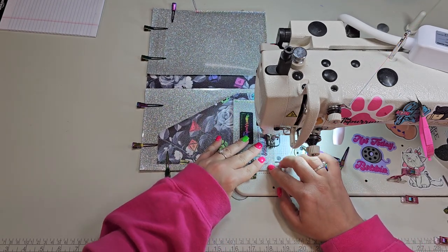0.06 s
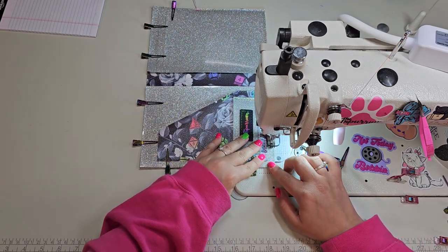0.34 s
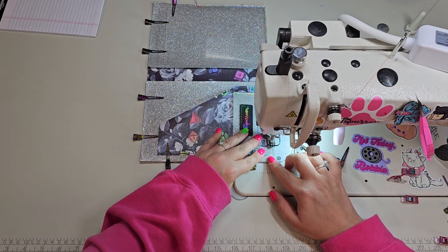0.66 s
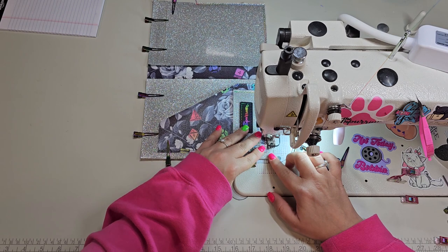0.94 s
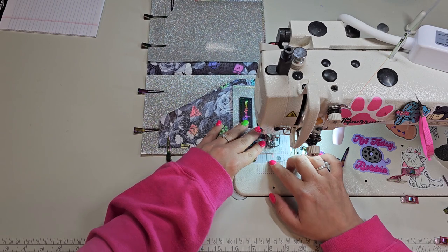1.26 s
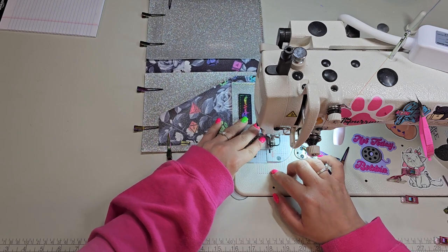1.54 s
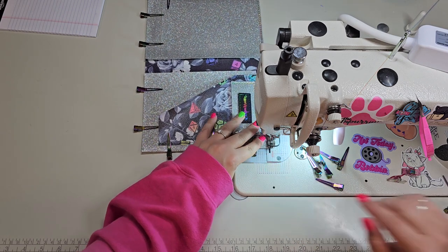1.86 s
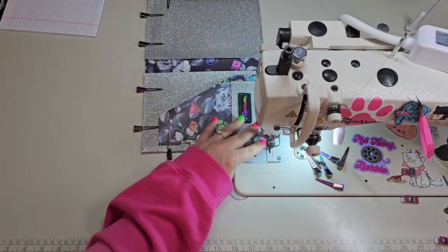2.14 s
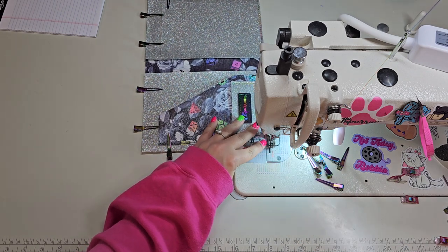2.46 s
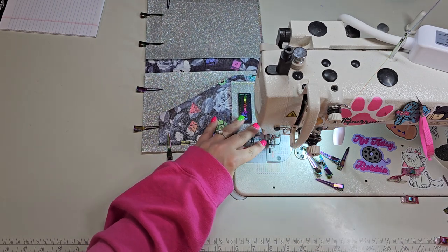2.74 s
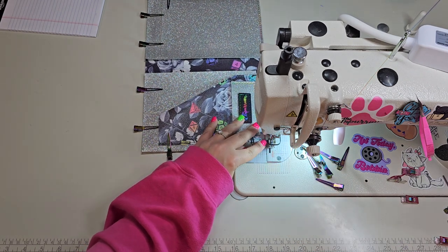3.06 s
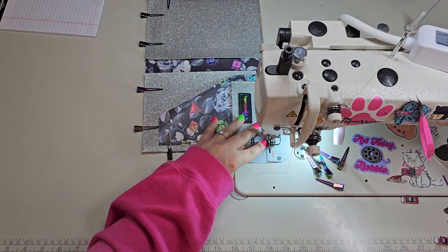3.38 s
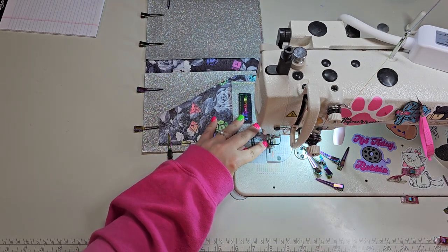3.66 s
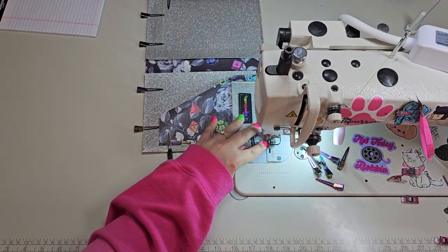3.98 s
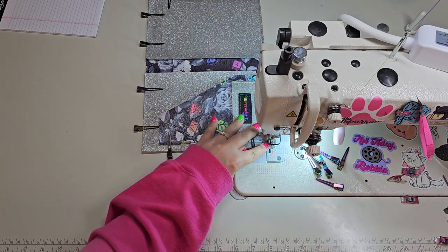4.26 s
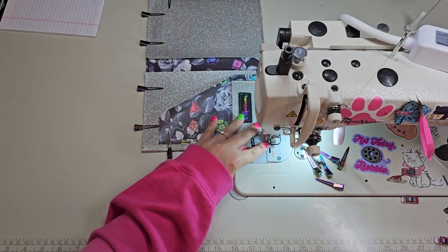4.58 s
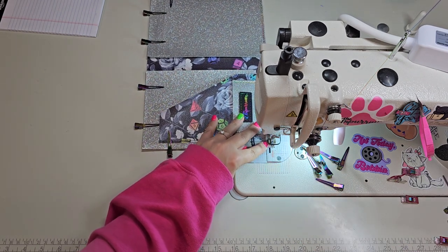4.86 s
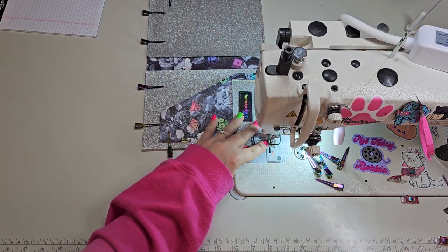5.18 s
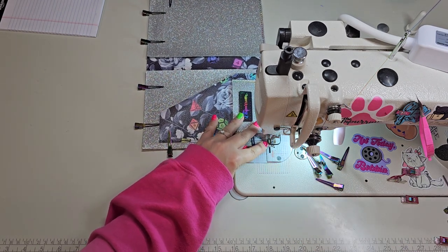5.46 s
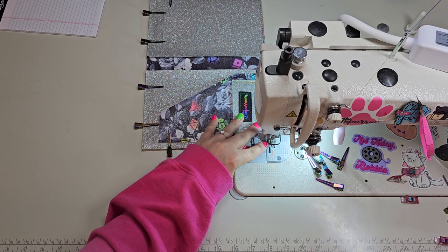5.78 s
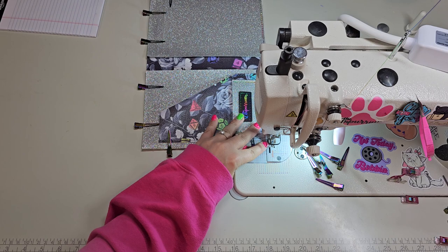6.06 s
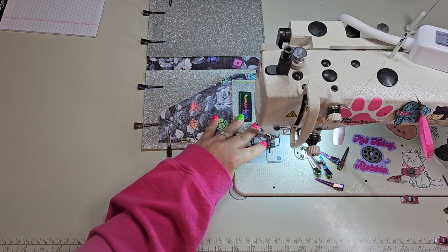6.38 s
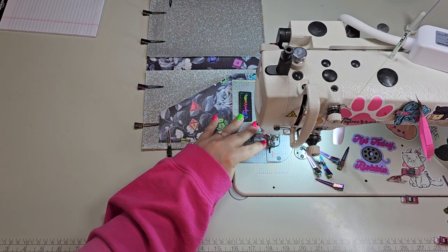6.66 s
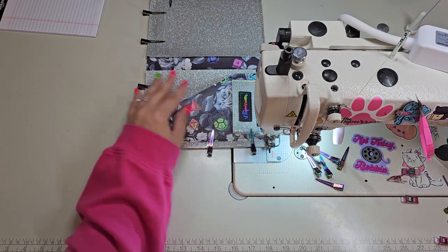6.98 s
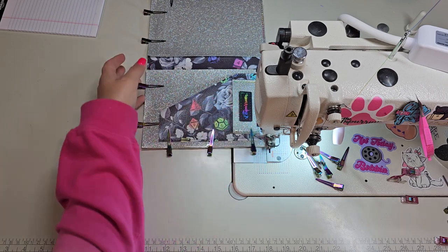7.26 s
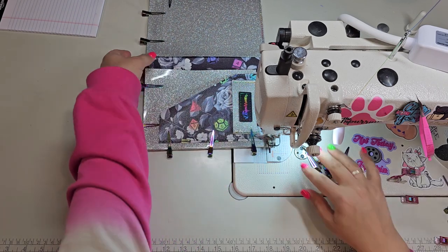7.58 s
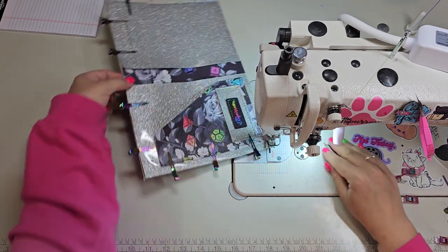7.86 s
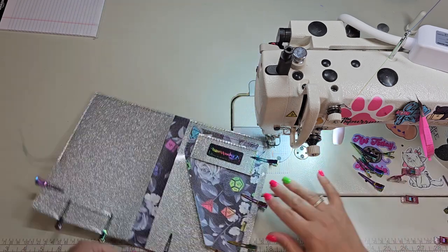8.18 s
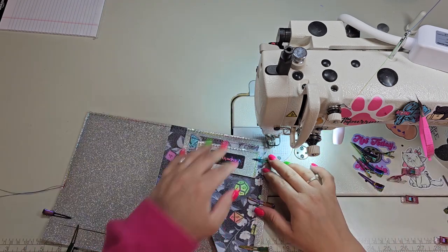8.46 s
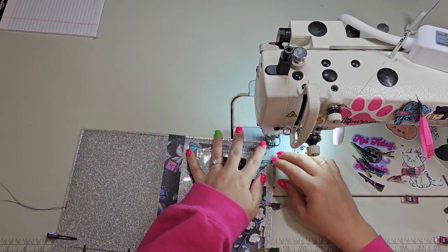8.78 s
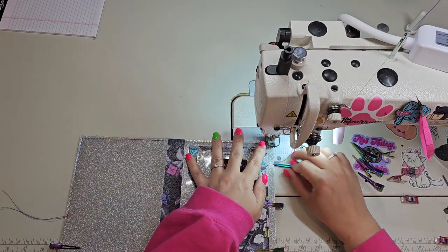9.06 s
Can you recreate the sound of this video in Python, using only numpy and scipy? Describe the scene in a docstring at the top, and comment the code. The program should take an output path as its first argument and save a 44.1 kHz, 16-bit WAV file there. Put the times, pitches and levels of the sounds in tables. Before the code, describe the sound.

Heard close by in a small, quietly humming room, a heavy sewing machine clatters through a brief, uneven run of stitches and slows to a halt. A lever clacks and creaks, and a few knocks follow before a lull. In the last third the handling gets busier: sharp clicks, light metallic pings, dull bumps of hands on the table and the soft hiss of vinyl being pushed around.

```python
"""Slow, clashing stitches: a walking-foot industrial sewing machine working through layered vinyl.
Each stitch is a needle clash, a foot drop and a thump of the feed over the rumble of the drive.
Then the machine rests: levers clack, small steel parts ping, hands bump the table and slide the work.
Heard from beside the table in a small ventilated room, on a stereo pair of microphones
whose faint hiss sinks in the pauses."""
import sys
import numpy as np
from scipy import signal
from scipy.fft import rfft, irfft, next_fast_len
from scipy.io import wavfile

SR = 44100
rng = np.random.default_rng(int(sys.argv[2]) if len(sys.argv) > 2 else 0)


def master_out(mix):
    """Clip the mix to full scale and print it as 16-bit PCM to the path in sys.argv[1]."""
    frames = np.transpose(np.atleast_2d(mix))
    ceiling = np.clip(frames, -1, 1)
    pcm = np.round(ceiling * 32767).astype(np.int16)
    wavfile.write(sys.argv[1], SR, pcm)


N = 407043
TIME = np.arange(N) / SR
BLOW = np.arange(-SR // 10, SR * 2 // 5) / SR   # seconds round one contact
FULL_SPEED_TURN_S, LOAD_SHARE = 0.16, 0.56   # fastest turn of the shaft; share of a turn under load
RATTLE_BY_SPEED = 2.6   # dB gained per dB of shaft speed

# Turns of the main shaft. Each row: needle punch in seconds, length of the turn in seconds,
# foot gain in dB, feed thump gain in dB.
STITCHES = [(-0.1, 0.17, -28.5, -37.5), (0.0539, 0.2, -32.5, -57), (0.4639, 0.21, -28.5, -46.5),
            (0.6496, 0.16, -29.5, -45), (0.818, .17, -30, -43), (0.9874, .169, -29.5, -45),
            (1.156, .183, -32, -48), (1.3413, 0.18, -35, -48.5), (1.5326, 0.19, -29, -51),
            (1.723, 0.26, -37, -68)]
# How alike the two microphones hear the room. Each row: frequency in Hz, left-right correlation.
LIKENESS = [(100, 0.98), (300, 0.82), (600, .5), (1200, 0.041), (2500, 0.22), (5000, 0.031), (12000, .05)]
# Spectrum of a hard clack on the machine. Each row: frequency in Hz, relative level in dB.
CLACK_COLOUR = [(400, -13), (650, 4), (900, -2.5), (1350, 2.5), (1750, -4), (2300, 2.5), (3200, -3),
                (4400, -6.5), (6500, -17.5)]
# Spectrum of rubbed vinyl. Each row: frequency in Hz, relative level in dB.
RUB_COLOUR = [(600, 8), (1000, 3.5), (1300, 6), (2600, 6), (5200, 0.5), (8000, -15), (11000, -11),
              (15000, -37)]


def from_db(db):
    """Decibels to gain."""
    return 10 ** (np.asarray(db) / 20)


def rms_one(x):
    """Scale to unit power."""
    return x / np.sqrt(np.mean(x ** 2) + 1e-20)


def at_hz(points, hz):
    """Read a table on a log-frequency axis."""
    f, value = np.transpose(points)
    return np.interp(np.log(hz + 1), np.log(f), value)


def panned(x, left_db):
    """Lean a sound towards the left microphone."""
    return x * from_db([[left_db / 2], [-left_db / 2]])


def noise(colour, size=len(BLOW), ripple_db=0):
    """Coloured stereo noise of unit power, diffuse in the treble; ripple adds small resonances."""
    padded = next_fast_len(size)
    hz = np.arange(padded // 2 + 1) * SR / padded
    mid, side = np.exp(2j * np.pi * rng.random((2, len(hz))))
    ripple = np.interp(hz, np.geomspace(700, 17000, num=260), 2.3 * rng.random(260) ** 2 - 1, left=0)
    alike = np.clip(at_hz(LIKENESS, hz), 0, 1)
    roll_off = np.minimum(hz / colour[0][0], 1) ** 4 / np.maximum(hz / colour[-1][0], 1) ** 2
    pair = np.sqrt(1 + alike) * mid + np.sqrt(1 - alike) * side * [[1], [-1]]
    spectrum = pair * roll_off * from_db(at_hz(colour, hz) + ripple_db * ripple)
    return rms_one(irfft(spectrum, padded)[:, :size])


def envelope(rise, hold, t60):
    """A contact swells up to time zero, holds and dies away; all times in seconds."""
    swell = np.exp(np.minimum(BLOW, 0) / max(rise, 1 / SR))
    return swell * from_db(-60 * np.maximum(BLOW - hold, 0) / t60)


def burst(carrier, shape):
    """Noise under an envelope, scaled to the envelope's energy."""
    return rms_one(carrier * shape) * np.sqrt(np.mean(shape ** 2))


def grain(depth_db, per_s, size=len(BLOW)):
    """Quick random changes of level, unit power."""
    steps = np.arange(size) * per_s / SR
    wander = np.interp(steps, np.arange(size // 8), rng.standard_normal(size // 8))
    return rms_one(from_db(depth_db * wander))


def ring(modes, vary_db):
    """Struck modes, a little different at each blow; high ones reach the microphones out of step."""
    age, out = np.maximum(BLOW, 0), 0
    for (hz, db, t60), (force, skew) in zip(modes, rng.standard_normal((len(modes), 2))):
        alike = np.clip(at_hz(LIKENESS, hz), 0, 1)
        lag = np.arccos(alike) / 2 * np.sign(skew) * np.array([[1], [-1]])
        out = out + from_db(db + vary_db * force - 60 * age / t60) * np.sin(2 * np.pi * hz * age + lag)
    return out * (BLOW > 0)


def add(track, s, sound):
    """Mix one contact into a track at s seconds."""
    start = round((s + BLOW[0]) * SR)
    first, last = max(start, 0), min(start + len(BLOW), N)
    track[:, first:last] += sound[:, first - start:last - start]


def repeated(colour, body, same):
    """The same parts collide each stitch, so a share of their dense ringing repeats."""
    return np.sqrt(same) * body + np.sqrt(1 - same) * noise(colour, ripple_db=5)


def speed_db(turn):
    """Shaft speed against full speed, in dB."""
    return 20 * np.log10(FULL_SPEED_TURN_S / turn)


def room():
    """Room tone: ventilation with a low, wavering hum, a little to the left."""
    # Moving air. Each row: frequency in Hz, relative level in dB.
    air_colour = [(15, -28), (25, 3.5), (33, -11.5), (92, -5), (195, -15.5), (285, -10), (384, -19.5),
                  (591, -14.5), (1020, -26.5), (1440, -19), (1700, -28), (5140, -40), (8140, -64),
                  (9570, -55), (16000, -54)]
    # Hum tones. Each row: frequency in Hz, level in dB.
    tones = [(91.5, -87), (285.3, -83.5)]
    hum = 0
    for hz, db in tones:
        tone = from_db(db) * np.sqrt(2) * np.sin(2 * np.pi * hz * TIME)
        hum = hum + tone * grain(depth_db=3, per_s=13, size=N)
    air = from_db(-67.5) * noise(air_colour, size=N)
    return panned(air + hum, left_db=2.0)


def lifter_creaks():
    """The foot lifter sticks and slips, creaking in its resonances."""
    # Creaks. Each row: start in seconds, length in seconds, level in dB.
    creaks = [(2.562, 0.054, -49), (7.472, 0.057, -62), (7.491, 0.1, -56)]
    # The lifter's resonances. Each row: centre in Hz, width in Hz, relative level in dB.
    resonances = [(1181, 21, 17), (2430, 570, 2.5), (2970, 440, -14)]
    out, hz = np.zeros((2, N)), np.geomspace(600, 6000, num=200)
    response = sum(from_db(db) / np.hypot(1, 2 * (hz - centre) / width)
                   for centre, width, db in resonances)
    colour = np.column_stack([hz, 20 * np.log10(response)])
    for s, length, db in creaks:
        slips = noise(colour, ripple_db=5.5) * grain(depth_db=3, per_s=400)
        slips *= grain(depth_db=1.5, per_s=70.7)
        add(out, s, from_db(db) * slips * envelope(rise=0.0021, hold=length, t60=0.054))
    return out


def finger_rubs():
    """Fingers rub the work with a grainy rasp."""
    # Rubs. Each row: start in seconds, length in seconds, level in dB.
    rubs = [(2.653, 0.053, -55.5), (2.77, 0.072, -58.5), (2.875, 0.0067, -62.5), (6.462, 0.17, -57.5),
            (7.756, 0.11, -58), (9.131, 0.12, -48)]
    out = np.zeros((2, N))
    for s, length, db in rubs:
        rub = noise(RUB_COLOUR, ripple_db=5) * grain(depth_db=3, per_s=300)
        add(out, s, from_db(db) * rub * envelope(rise=0.0088, hold=length, t60=0.15))
    return out


def vinyl_slides():
    """Vinyl hisses across the bed; each push starts briskly, eases off and stops."""
    # Pushes. Each row: start in seconds, length in seconds, level in dB.
    pushes = [(2.594, .015, -50), (6.533, 0.053, -53.5), (6.72, .23, -73.5), (7.971, 0.51, -54),
              (8.881, .06, -56), (9.16, .1, -57)]
    # Sliding vinyl. Each row: frequency in Hz, relative level in dB.
    colour = [(290, -49.5), (500, -23), (553, -7.5), (716, -11), (815, -0.5), (1130, -11), (1240, -5),
              (1670, -9), (1990, -4.5), (2500, -18), (3150, -7.5), (7130, -6.5), (15500, -1.5)]
    rise_s, ease_db_per_s, t60_s = 0.01, 7, 0.18
    level = np.zeros(N)
    for s, length, db in pushes:
        age = TIME - s
        fall_db = ease_db_per_s * np.maximum(age, 0) + 60 * np.clip(age - length, 0, 1) / t60_s
        level += np.exp(np.clip(age / rise_s, -20, 0)) * from_db(db - fall_db)
    level *= grain(depth_db=3.5, per_s=35, size=N)
    return level * noise(colour, size=N, ripple_db=5) * grain(depth_db=1, per_s=630, size=N)


def steel_pings():
    """A small steel tool is touched: it clicks and rings briefly."""
    # Touches. Each row: time in seconds, gain in dB.
    touches = [(6.198, -47.5), (6.665, -47), (6.952, -42), (6.975, -41), (6.998, -53.5), (7.3795, -58),
               (7.392, -53)]
    # The click. Each row: frequency in Hz, relative level in dB.
    colour = [(900, -5), (1700, 13.5), (2300, 3), (3200, -4.5), (5000, -12), (6500, -5.5), (16000, -10)]
    # The tool's modes. Each row: frequency in Hz, relative level in dB, t60 in seconds.
    modes = [(2060, -12, 0.056), (5050, -17, 0.073), (5040, -3.5, 0.074), (9168, -11.5, 0.08),
             (14000, -31, .07)]
    out = np.zeros((2, N))
    for s, db in touches:
        click = noise(colour, ripple_db=8) * grain(depth_db=3, per_s=400)
        clink = from_db(-10) * burst(click, envelope(rise=0.0015, hold=0.003, t60=0.1))
        add(out, s, from_db(db) * (clink + ring(modes, vary_db=1)))
    return out


def table_bumps():
    """Hands and pedal stir only the table's low notes, which linger faintly in the room."""
    # Bumps. Each row: time in seconds, gain in dB, swell in seconds, pitch in Hz.
    bumps = [(2.689, -42, 0.055, 178), (3.802, -41, 0.0052, 175), (4.414, -52.5, .008, 88),
             (4.518, -43, 0.017, 89.5), (6.366, -52, .0065, 103), (6.427, -44.5, 0.02, 110),
             (6.461, -39.5, 0.0069, 151), (6.493, -39, 0.013, 178), (6.782, -52, .06, 195),
             (7.68, -51, 0.0088, 234), (7.795, -36.5, 0.022, 170), (7.821, -37.5, .0044, 232),
             (8.812, -41.5, 0.0046, 128), (9.005, -37.5, 0.02, 123), (9.038, -40.5, 0.011, 88.5),
             (9.119, -37.5, 0.0013, 173)]
    # A soft bump. Each row: multiple of the pitch, relative level in dB.
    colour = [(.55, -16), (.72, -1), (1, 2), (1.4, -4), (2.3, -12.5), (4, -19.5), (12, -35), (30, -43)]
    out = np.zeros((2, N))
    for s, db, swell, hz in bumps:
        contact = envelope(rise=swell, hold=0.0036, t60=0.17)
        linger = from_db(-19.5) * envelope(rise=swell, hold=0.015, t60=0.68)
        low_notes = noise(np.array(colour) * [hz, 1])
        add(out, s, from_db(db - 6) * burst(low_notes, contact + linger))
    return panned(out, left_db=-0.8)


def lever_clacks():
    """Levers, clips and fingernails strike: a crack, a bright tick, ringing iron, a table thud."""
    # Strikes. Each row: time in seconds, clack, thud and tick gains in dB, hardness from 0 to 1.
    strikes = [(0.292, -53, -68, -57.5, 0.36), (0.374, -51.5, -67, -90, 0),
               (0.5075, -34.5, -42.5, -36, 0.26), (1.7827, -49, -54, -62, 0.94),
               (1.8708, -53.5, -59, -57, 0), (2.6262, -39.5, -49, -38, 0.8),
               (3.2701, -62.5, -76, -66, 0.05), (3.4013, -55, -61, -90, 0), (3.6989, -47, -58.5, -60, 0),
               (3.7877, -38, -33, -41.5, 0.54), (4.321, -62, -63, -60, 0.5), (4.351, -50.5, -71, -65, .08),
               (4.4992, -42.5, -41.5, -58, 0.23), (6.199, -45.5, -51.5, -49, 0.24),
               (6.4226, -57, -74, -53.5, 0.02), (6.4833, -41, -44.5, -59, 0),
               (6.5623, -40, -54, -35.5, 0.56), (6.612, -41.5, -58, -54, .05), (6.663, -37.5, -52, -48, .2),
               (7.326, -82, -65, -50.5, 0.2), (7.5913, -44.5, -51.5, -48.5, 0.29),
               (7.797, -45.5, -39, -45.5, 0), (8.2812, -64, -63, -49, 0.6), (8.354, -46, -46.5, -71, 0.62),
               (8.3975, -42.5, -56, -37, 0), (8.4286, -39, -45.5, -34, 0.4), (8.4343, -37, -43, -33, 0.92),
               (8.8033, -43.5, -64, -46, 0), (8.9986, -39, -38.5, -49.5, 0.01)]
    # The tick and the thud. Each row: frequency in Hz, relative level in dB.
    tick_colour = [(3000, -8.5), (5000, -2.5), (7000, -4), (9000, -6.5), (12000, -10), (16000, -8.5)]
    thud_colour = [(60, -21), (95, 3), (160, -1), (300, 4.5), (400, 4.5), (560, -6), (700, -21.5),
                   (1000, -30.5)]
    # Modes of iron casting and table. Each row: frequency in Hz, relative level in dB, t60 in seconds.
    casting_modes = [(1066, -13, .1), (1307, -4, 0.11), (1850, -12, 0.1), (2080, -5, .15), (2230, -7, .09),
                     (2420, -8, 0.12), (2945, -13, 0.1), (3420, -14, .08), (4290, -17, 0.13),
                     (4657, -10, .09)]
    table_modes = [(95, -7, 0.27), (215, -16.5, 0.17), (287.5, -11.5, 0.6), (307.7, 3, 0.15),
                   (411, -1, 0.09), (493.3, -2.5, 0.2), (546, -16, .12)]
    out = np.zeros((2, N))
    for s, clack_db, thud_db, tick_db, hardness in strikes:
        clack = from_db(clack_db) * noise(CLACK_COLOUR, ripple_db=8)
        tick = from_db(tick_db) * noise(tick_colour, ripple_db=7)
        crack = burst(clack + tick, envelope(rise=0.0002, hold=0.001, t60=0.022))
        crack *= hardness * from_db(clack_db + 7.5)
        tail = clack * envelope(rise=0.0013, hold=0.0036, t60=0.16)
        tail += tick * envelope(rise=0.0004, hold=0.0012, t60=0.145)
        chatter = from_db(-7.5) * tail * grain(depth_db=3.5, per_s=890)
        casting = from_db(clack_db - 6) * ring(casting_modes, vary_db=2)
        table = from_db(-8.5) * ring(table_modes, vary_db=1)
        thud = from_db(-5.5) * burst(noise(thud_colour), envelope(rise=0.00084, hold=0.0098, t60=0.2))
        add(out, s, crack + chatter + casting + from_db(thud_db) * (thud + table))
    return panned(out, left_db=0.2)


def drive():
    """Belt, shafts and bearings rumble under the load of each stitch, then coast; faster is louder."""
    # The rumble. Each row: frequency in Hz, relative level in dB.
    colour = [(50, -23), (110, -4.5), (160, -7), (235, 5), (390, -12.5), (550, -0.5), (700, -23),
              (1300, -12), (2000, -19), (2700, -26), (3150, -8), (3800, -34), (7000, -26.5), (15000, -35.5)]
    out = np.zeros((2, N))
    load = envelope(rise=0.017, hold=LOAD_SHARE * FULL_SPEED_TURN_S, t60=0.57)
    for s, turn, _, _ in STITCHES:
        rumble = noise(colour) * grain(depth_db=2, per_s=140)
        add(out, s, from_db(-48.5 + 1.2 * speed_db(turn)) * burst(rumble, load))
    return panned(out, left_db=1.3)


def linkage_clatter(per_turn):
    """Play in the linkage adds small ticks at chance moments in the loaded part of every turn."""
    full_speed_db, spread_db = -47.5, 6
    out = np.zeros((2, N))
    for s, turn, _, _ in STITCHES:
        for share, force in zip(rng.random(per_turn), rng.standard_normal(per_turn)):
            db = full_speed_db + spread_db * force + RATTLE_BY_SPEED * speed_db(turn)
            tick = burst(noise(CLACK_COLOUR, ripple_db=8), envelope(rise=0.0005, hold=0.001, t60=0.05))
            add(out, s + share * LOAD_SHARE * turn, from_db(db) * tick)
    return out


def feed():
    """The feed reverses at half a turn: it thumps, rattles, and ticks as its slack is taken up."""
    # Modes of the thump. Each row: frequency in Hz, relative level in dB, t60 in seconds.
    modes = [(60.3, -41.5, 0.097), (87.7, -0.5, 0.18), (156.2, -1.5, 0.59), (251, -2.5, 0.18),
             (300, -8.5, 0.1)]
    # The rattle. Each row: frequency in Hz, relative level in dB.
    colour = [(60, 3), (240, 19), (380, -3.5), (530, -13), (900, 4.5), (2500, 10), (4500, 8.5),
              (8500, -0.5), (16000, -0.5)]
    out = np.zeros((2, N))
    for punch, turn, _, thump_db in STITCHES:
        s = punch + 0.5 * turn
        rattle_db = -41.5 + RATTLE_BY_SPEED * speed_db(turn)
        thump = from_db(thump_db) * ring(modes, vary_db=1)
        rattle = burst(noise(colour, ripple_db=8), envelope(rise=0.00082, hold=0.0032, t60=0.19))
        slack = burst(noise(CLACK_COLOUR, ripple_db=8), envelope(rise=0.0013, hold=0.0023, t60=0.03))
        add(out, s, thump + from_db(rattle_db) * rattle)
        add(out, s + 0.053, from_db(rattle_db - 6) * slack)
    return panned(out, left_db=-0.9)


def foot():
    """The foot lands with one sharp steel tick and a dull tap on the needle plate."""
    # The tick. Each row: frequency in Hz, relative level in dB.
    colour = [(50, 15.5), (130, -27.5), (240, 6), (380, 1.5), (520, 18.5), (800, 6), (1300, 10),
              (2500, -3.5), (4300, 7), (7000, 10), (8300, -3), (9500, 9), (11200, -0.5), (13000, 12),
              (16000, -1.5)]
    # Modes rung by the landing. Each row: frequency in Hz, relative level in dB, t60 in seconds.
    modes = [(218.4, -30, .2), (552, -26, 0.42), (1300, -24.5, .12), (2030, -23, 0.2), (4188, -21, .2),
             (6971, -16, .19), (12850, -26, .15), (12952, -24, 0.196), (13361, -27, .15)]
    landing_share = 0.35   # of a turn, after the punch
    out, body = np.zeros((2, N)), noise(colour, ripple_db=7)
    for punch, turn, db, _ in STITCHES:
        steel = repeated(colour, body, same=0.97) * grain(depth_db=3.5, per_s=320)
        tick = from_db(-9) * burst(steel, envelope(rise=0.00025, hold=0.0071, t60=0.12))
        tap = from_db(-11) * burst(noise(CLACK_COLOUR), envelope(rise=0.00016, hold=0.00052, t60=0.021))
        add(out, punch + landing_share * turn, from_db(db) * (tick + tap + ring(modes, vary_db=1.6)))
    return out


def needle():
    """The point squeezes through the vinyl; then the needle bar clashes, ringing arm and table."""
    # The clash. Each row: frequency in Hz, relative level in dB.
    colour = [(40, 1), (90, -41), (230, 19), (370, 3), (520, 12), (750, 1.5), (1100, 4.5), (1700, 5.5),
              (3100, 8), (5500, 7), (8500, 2.5), (10500, 3), (13000, 7), (16000, 2.5)]
    # Modes of arm and table. Each row: frequency in Hz, relative level in dB, t60 in seconds.
    modes = [(156.8, -16, 0.24), (230, -20.5, 0.11), (521, -25, 0.15), (1058, -17, 0.08),
             (2050, -23.5, 0.23), (2582, -10.5, 0.13), (2940, -22, 0.17), (3090, -19.5, 0.33),
             (4640, -24.5, 0.18), (5400, -26.5, .15)]
    out, body = np.zeros((2, N)), noise(colour, ripple_db=4.5)
    for s, turn, _, _ in STITCHES:
        db = -25.5 + 0.34 * speed_db(turn)
        pierce = from_db(-21) * noise(RUB_COLOUR) * envelope(rise=0.021, hold=0, t60=0.03)
        chatter = repeated(colour, body, same=0.61) * grain(depth_db=2, per_s=710)
        clash = burst(chatter, envelope(rise=0.0015, hold=0.0088, t60=0.15))
        add(out, s, from_db(db) * (from_db(-8.5) * (pierce + clash) + ring(modes, vary_db=1.5)))
    return panned(out, left_db=-1.5)


def scene():
    """The machine, the handling and the room, as they reach the microphones."""
    machine = needle() + foot() + feed() + drive() + linkage_clatter(per_turn=2)
    knocks = lever_clacks() + table_bumps() + steel_pings()
    friction = lifter_creaks() + finger_rubs() + vinyl_slides()
    return machine + knocks + friction + room()


def suppressed_hiss(sound):
    """A noise suppressor opens with the treble it hears and closes slowly: hiss sinks in the pauses."""
    # Microphone hiss. Each row: frequency in Hz, relative level in dB.
    colour = [(800, 6), (2000, -5), (4800, -3.5), (6000, -13), (10000, -12.5), (16000, -13.5)]
    open_db, memory_s, slope = -70, 0.55, 0.49   # slope: dB of hiss per dB of treble
    high_pass = signal.butter(2, 3000, "high", fs=SR, output="sos")
    treble = np.abs(signal.sosfilt(high_pass, sound.mean(axis=0)))
    keep = np.exp(-1 / (memory_s * SR))
    heard = signal.lfilter([1 - keep], [1, -keep], treble)
    return from_db(open_db) * (heard / heard.max()) ** slope * noise(colour, size=N)


def record(dry):
    """The microphones hiss faintly, favour the left and shed the deepest bass; the top is cut steeply."""
    # Mismatch of the pair. Each row: frequency in Hz, left over right in dB.
    shading = [(1000, 1.4), (2500, 1.5), (5000, 1.6), (9000, 0.9), (13000, 3.5)]
    padded = next_fast_len(N + SR // 10)
    left_db = at_hz(shading, np.arange(padded // 2 + 1) * SR / padded)
    spectrum = rfft(dry + suppressed_hiss(dry), padded)
    shaded = irfft(spectrum * from_db([left_db / 2, -left_db / 2]), padded)[:, :N]
    thinned = signal.sosfilt(signal.butter(4, 44, "high", fs=SR, output="sos"), shaded)
    return signal.sosfilt(signal.ellip(10, 0.2, 80, 16000, fs=SR, output="sos"), thinned)


dry = scene()
out = record(dry)
master_out(out)
```